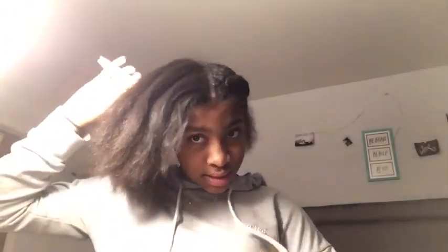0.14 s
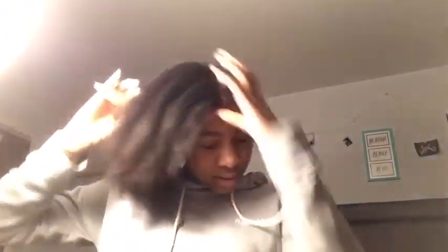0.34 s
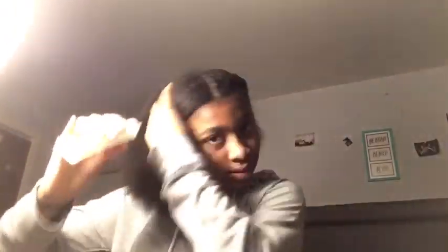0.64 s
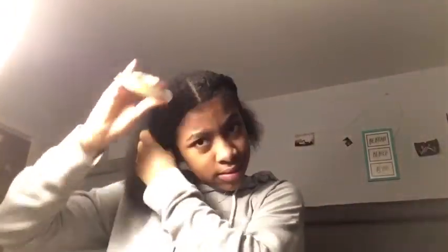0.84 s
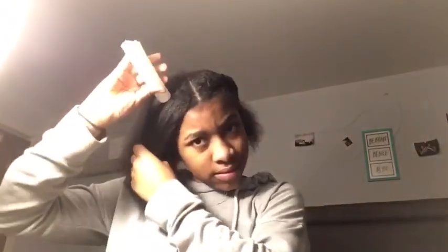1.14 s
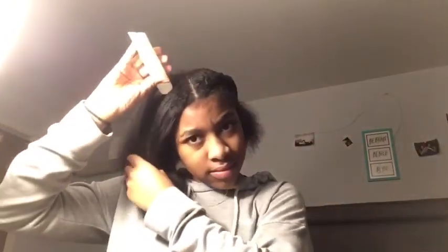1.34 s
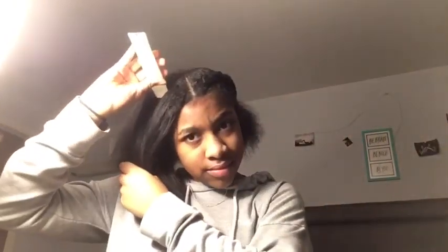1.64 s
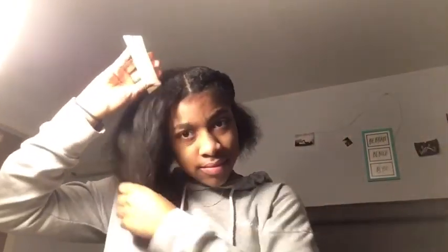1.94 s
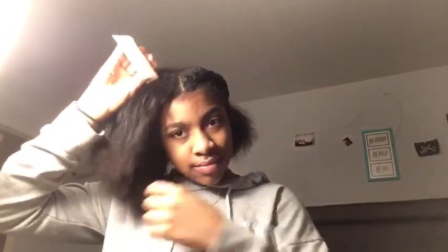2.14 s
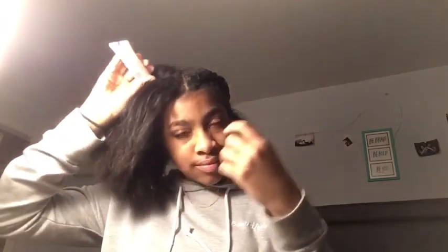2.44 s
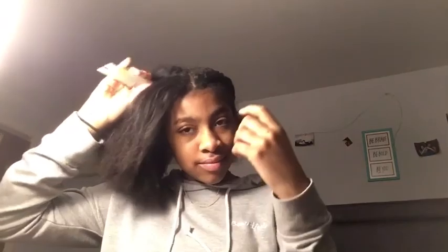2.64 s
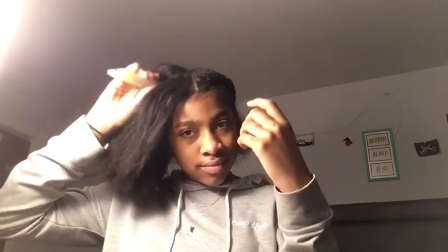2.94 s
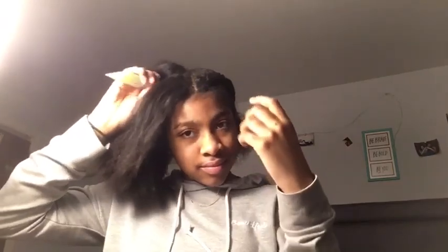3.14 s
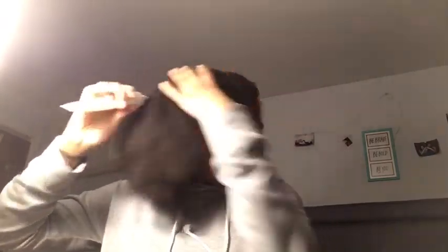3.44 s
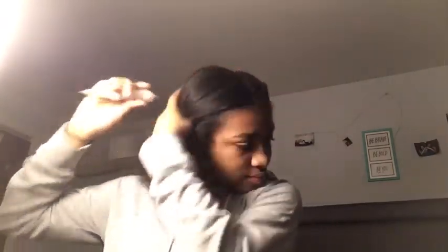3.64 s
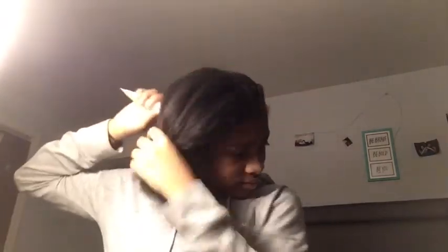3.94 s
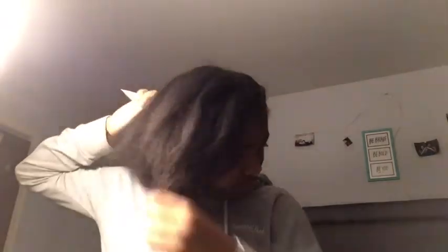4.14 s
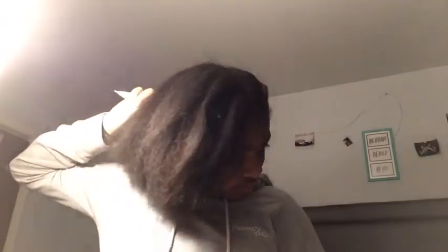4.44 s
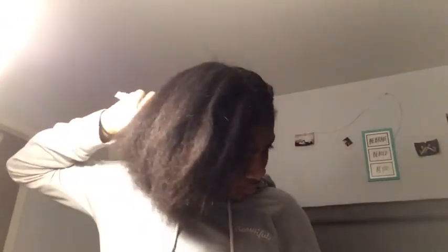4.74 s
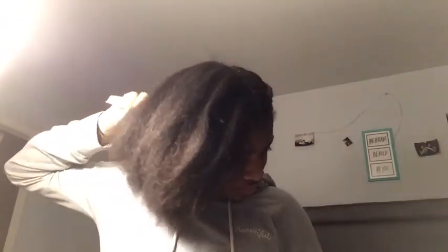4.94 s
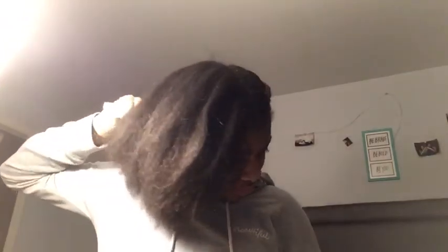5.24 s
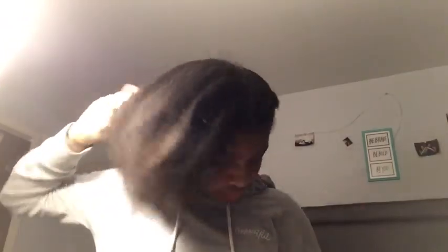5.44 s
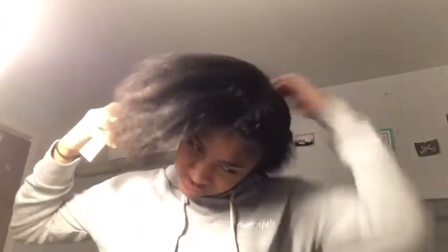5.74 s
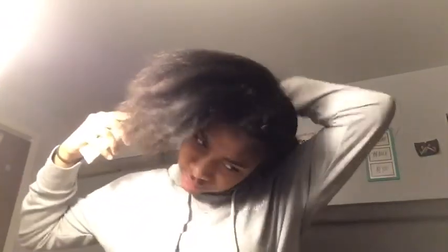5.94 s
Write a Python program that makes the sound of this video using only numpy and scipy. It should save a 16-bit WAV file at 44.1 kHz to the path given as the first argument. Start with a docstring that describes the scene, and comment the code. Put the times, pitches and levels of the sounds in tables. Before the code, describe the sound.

A plastic comb scratches through dry hair in short strokes, with sleeves rustling, over a low hum in a small room.

```python
"""A plastic comb scratches through dry hair in a small room, close to one microphone.
From the start, an appliance hums behind the wall over a swelling rumble and a steady hiss.
First the hair sweeps over cloth, with soft knocks. Short strokes follow: strands slip over the
ringing teeth, hands and sleeves rustle, tangles let go with a click. Near 4 seconds a long stroke
squeaks during a second sweep. More strokes and knocks lead to a last sweep near 6 seconds."""
import sys
import numpy as np
from scipy import signal
from scipy.fft import rfft, irfft, next_fast_len
from scipy.io import wavfile
from scipy.ndimage import uniform_filter1d, map_coordinates

SR = 44100
rng = np.random.default_rng(int(sys.argv[2]) if len(sys.argv) > 2 else 0)


def dump_mix(stems):
    """Bounce the given channels to the path in sys.argv[1] as a 16-bit WAV at rate SR."""
    frames = np.atleast_2d(stems).T  # one column per channel
    limited = np.clip(frames, -1, 1)  # hard clip at full scale
    pcm = np.round(limited * 32767).astype(np.int16)
    wavfile.write(sys.argv[1], SR, pcm)


N = 269098

# Combing has three layers: strands, teeth and hand. Each mixes a fixed "body" noise with a "ring",
# a band of noise whose pitch moves. Ring strength is the ring's level compared with the body.
# Comb strokes. Each row: peak time and length in seconds, share spent rising, strand level in dB,
# ring pitch in Hz, ring strength in dB, delay of the teeth in seconds, then the teeth's level in dB,
# ring pitch in Hz and ring strength in dB.
COMB_STROKES = [(0.033, 0.25, 0.54, -46, 7700, -3, 0, -52, 2550, -2),
                (0.144, 0.053, 0.65, -42.5, 11000, -5, 0.0092, -49, 2740, 8),
                (0.48, .25, 0.38, -57, 8950, -3, 0.0051, -61.5, 2770, -12),
                (0.982, 0.065, 0.47, -48, 9300, -6, -0.012, -53.5, 2800, -4),
                (1.118, 0.15, 0.64, -59, 7400, -5, -0.015, -55.5, 2920, -5),
                (1.243, 0.16, 0.38, -57, 8400, -3, 0.034, -60.5, 2750, -8),
                (1.456, 0.15, 0.5, -58.5, 7700, -3, -0.0068, -58.5, 2640, 6),
                (1.586, 0.15, 0.2, -54, 8500, 2, -0.011, -57, 2230, 12),
                (1.815, 0.1, .3, -56.5, 8750, 4, 0.0067, -60, 2400, 5),
                (1.95, 0.13, 0.2, -57, 8400, 0, 0.025, -55.5, 2260, 13),
                (2.01, .12, 0.5, -57.5, 8800, 1, 0.055, -64, 2440, -3),
                (2.134, 0.24, 0.4, -57.5, 8500, 0, 0, -56, 2560, -1),
                (2.245, 0.073, .15, -50.5, 8500, 2, 0, -60, 2700, -1),
                (2.3, 0.077, 0.42, -55.5, 8880, 5, -.01, -54, 2400, 7),
                (2.413, 0.099, 0.2, -56, 8100, 3, 0.0015, -56.5, 2740, -14),
                (2.518, 0.2, 0.45, -56, 8540, 4, .01, -57.5, 2670, -14),
                (2.683, 0.075, .55, -46, 10300, 2, 0, -58, 2900, -6),
                (2.746, 0.07, 0.62, -48, 7260, 4, 0.006, -52, 2620, -1),
                (2.904, 0.067, 0.51, -48.5, 8550, 3, 0.031, -52, 2760, 5),
                (3.062, 0.08, 0.38, -50, 6940, -1, -0.0035, -48.5, 2980, 2),
                (3.206, 0.062, 0.5, -47, 8750, 3, -0.018, -50, 3080, -3),
                (3.287, 0.24, 0.55, -56, 7000, 1, 0.041, -56, 2780, -11),
                (3.428, 0.085, 0.53, -61, 7800, 0, 0.0018, -54, 3350, -15),
                (3.696, 0.048, 0.5, -52, 11400, 5, 0, -71, 2750, -7),
                (4.026, 0.14, 0.57, -53, 7360, -21, 0.0083, -50, 2660, -15),
                (4.154, 0.28, .35, -43.5, 7350, -4, -0.0051, -43, 3850, 4),
                (4.43, 0.22, 0.46, -52.5, 6800, 11, -0.0094, -51, 2690, -11),
                (4.75, .13, 0.4, -54.5, 6800, -3, 0.016, -54, 2100, -1),
                (4.901, 0.083, 0.4, -56, 6460, 1, -0.0087, -56, 2350, -1),
                (5.047, 0.088, 0.44, -57, 6700, 3, 0.015, -58, 2600, -9),
                (5.188, 0.12, 0.55, -56, 6500, 4, -0.014, -59, 2140, 2),
                (5.42, 0.086, 0.6, -61, 6700, -2, 0.0034, -61, 2400, -3),
                (5.313, 0.051, .6, -56, 8390, -7, 0.0091, -55, 2800, -2),
                (5.637, 0.11, 0.47, -54.5, 8600, 3, 0.034, -61.5, 2580, 4),
                (5.95, .18, 0.65, -54.5, 7900, -4, 0.0043, -54.5, 2650, 0)]
# Hand and sleeve brush past. Each row: peak time and length in seconds, share spent rising,
# level in dB, ring pitch in Hz, ring strength in dB.
HAND_RUBS = [(0.03, .15, .5, -48, 554, -15), (0.106, 0.12, 0.48, -38.5, 910, -4.5),
             (0.23, 0.076, 0.4, -59, 480, 9), (0.43, 0.18, 0.23, -52.5, 590, 1),
             (0.563, 0.13, 0.34, -50.5, 740, 6), (0.913, 0.13, .6, -63, 760, -23),
             (1.805, .2, 0.1, -63, 560, 2), (2.247, 0.22, 0.2, -59, 800, 0),
             (2.69, 0.11, 0.33, -53, 980, 8), (3.082, 0.094, 1, -56, 690, -16),
             (3.35, 0.064, 0.43, -52, 704, -5), (3.497, 0.12, 0.6, -53, 600, 4),
             (3.723, 0.092, 0.51, -50.5, 890, -0.5), (3.863, .14, 0.2, -61, 900, -9),
             (4.022, 0.092, 0.4, -51, 900, 7), (4.197, 0.089, .3, -56, 790, 12),
             (4.415, .12, 0.2, -50, 780, 4), (4.753, 0.052, 0.44, -53.5, 1090, -7),
             (4.903, 0.046, 0.5, -52, 1110, -6), (5.036, 0.066, 0.5, -54, 800, -14),
             (5.27, .12, 0.47, -56, 640, 9), (5.565, 0.065, 0.43, -53, 1180, -8),
             (5.81, 0.065, .4, -52, 600, -5), (5.855, 0.12, 0.6, -51.5, 1320, 2)]
# Comb and hand rest in the hair. Each row: time in seconds, then strand, teeth and hand levels in dB.
REST_LEVELS = [(0, -69, -66, -60.5), (.8, -65, -64.5, -59.5), (1.6, -76, -70.5, -61),
               (2.1, -64.5, -66, -57.5), (2.8, -63, -62, -59.5), (3.2, -61, -67.5, -60),
               (3.6, -62.5, -64, -59), (3.9, -65.5, -65, -57), (4.7, -70, -66, -58),
               (5.1, -69.5, -70, -60.5), (5.5, -63, -59.5, -58.5), (5.75, -63.5, -60, -58),
               (6.1, -63, -67.5, -59)]
# Strands, teeth and hand at rest. Each row: ring pitch in Hz, ring strength in dB.
REST_RINGS = [(7850, -7), (2560, -8), (640, -5.5)]
# The same layers in a sweep. Each row: dB added to the sweep level, ring pitch in Hz, strength in dB.
SWEEP_LAYERS = [(-5, 7200, -10), (-4, 2700, -27), (-3.5, 680, 0.5)]
# The bands that each layer's ring moves between. Each row: pitch in Hz, width in Hz.
STRAND_BANDS = [(6600, 900), (7600, 1100), (9500, 1400), (11500, 2200)]
TEETH_BANDS = [(2100, 400), (2700, 450), (3300, 550), (3900, 600)]
HAND_BANDS = [(400, 150), (650, 250), (950, 350), (1350, 450)]
# Pitches at which the comb and the room ring. Each row: pitch in Hz, width in Hz, relative level in dB.
TEETH_MODES = [(2200, 800, 0), (3700, 1100, 0), (6800, 1000, -9)]
ROOM_MODES = [(283.7, 3.9, 9), (363.5, 12.4, 14.5), (415, 38, 3), (654, 74, 4), (878, 10, -31),
              (866, 9.3, -30), (1230, 190, -11), (1445, 20, -16)]
# The tone colour of each noise. Each row: frequency in Hz, relative level in dB.
STRAND_COLOUR = [(1500, -36), (4000, 8), (5500, 12.5), (7000, 12.5), (8300, 9), (9700, 11.5), (12000, 12),
                 (15500, 0.5)]
SLEEVE_COLOUR = [(120, -23), (250, 0), (400, -2), (900, -4), (1400, -3.5), (2000, -8.5), (5000, -33)]
SWEEP_COLOUR = [(240, -26), (400, -7), (785, -9.5), (957, -4), (1130, 4), (3680, -7), (5000, -4.5),
                (7010, -11), (11400, -29), (15500, -21)]
HISS_COLOUR = [(70, -35), (100, 5.5), (130, -3.5), (280, -5.5), (500, -21), (900, -14.5), (1650, -29),
               (2500, -29), (4800, -23.5), (6800, -24), (9500, -27), (12000, -29), (14000, -30),
               (15500, -31)]
DRONE_COLOUR = [(15, -33), (25, -16), (35, 7), (47, 2.5), (62, 7), (85, -0.5), (110, -13), (160, -16),
                (400, -51)]
# Hair sweeps over cloth, one list per sweep. Each row: time in seconds, level in dB.
HAIR_SWEEPS = [
    [(0, -53), (.08, -50.5), (.14, -43), (.17, -53.5), (.25, -70)],
    [(3.94, -81), (3.95, -54.5), (4.03, -51), (4.12, -46), (4.2, -47.5), (4.3, -46.5), (4.45, -52.5),
     (4.58, -54.5), (4.66, -66)],
    [(5.78, -65), (5.86, -56.5), (5.94, -52.5), (6.02, -61)],
]
# The squeak's glide. Each row: time in seconds, pitch in Hz, level in dB.
SQUEAK_GLIDE = [(4.1, 1800, -72), (4.12, 2080, -53), (4.145, 2220, -50), (4.19, 2300, -52),
                (4.22, 2250, -70)]
# Soft knocks. Each row: start in seconds, relative level in dB, pitch in Hz, seconds to fade by 60 dB.
SOFT_KNOCKS = [(0.146, -39, 700, 0.0047), (0.157, -38.5, 399, 0.074), (3.346, -47, 630, 0.055),
               (4.402, -32.5, 253, 0.019), (5.564, -30.5, 1370, 0.0066), (5.731, -43, 300, 0.047),
               (5.81, -42.5, 590, 0.036)]
# Tangles let go. Each row: start in seconds, level in dB before filtering.
TANGLE_SNAPS = [(1.5694, -50), (1.6, -49), (1.6135, -43), (1.6361, -38.5), (1.6886, -46), (1.7962, -52),
                (2.085, -40), (2.2457, -47), (2.4123, -44), (3.048, -46), (3.3194, -45), (3.9453, -40),
                (4.7101, -47), (5.3042, -49)]
# The motor's steady tones. Each row: pitch in Hz, level in dB.
MOTOR_TONES = [(29.6, -68), (72.0, -43.5), (91.0, -60), (120.0, -69), (144.0, -66)]
# The rumble swells. Each row: peak time in seconds, length in seconds, level in dB.
RUMBLE_SWELLS = [(0.0, 0.13, -45), (0.166, 0.11, -46), (0.5, 0.12, -36), (0.607, 0.11, -41.5),
                 (1.07, .14, -40), (1.253, 0.42, -48), (1.71, 0.14, -38), (1.944, 0.3, -42.5),
                 (2.083, .08, -42), (2.237, 0.13, -39), (2.47, 0.24, -45.5), (2.936, 0.055, -36),
                 (3.066, .09, -39.5), (3.468, 0.15, -40.5), (3.66, 0.054, -39), (3.764, 0.14, -44),
                 (4.08, 0.075, -36.5), (4.347, 0.21, -43), (4.518, 0.053, -40), (4.627, 0.17, -39.5),
                 (4.787, 0.18, -43), (4.936, 0.13, -41.5), (5.302, 0.1, -41), (5.423, 0.26, -45.5),
                 (5.65, .25, -48), (5.845, 0.12, -34), (5.966, .12, -42), (6.1, 0.15, -39)]
# The room's echo. Each row: frequency in Hz, seconds to fade by 60 dB.
ROOM_DECAY = [(200, 0.67), (2000, 0.079), (10000, 0.37)]
# Dips caused by the microphone housing. Each row: frequency in Hz, width in Hz, depth from 0 to 1.
HOUSING_DIPS = [(4900, 390, 0.21), (7780, 1100, 0.2), (10400, 290, 0.4)]

RUMBLE_HZ, RUMBLE_LEAST_DB = 54, -60
HISS_DB, DRONE_DB, ECHO_DB = -57, -52, -10.5
TOP_HZ = 15720
TIME = np.arange(N) / SR  # seconds


def combing():
    """Strands fizz as they slip over the comb, its teeth ring, and hand and sleeve rustle low."""
    peak_s, length_s, rise, strand_db, strand_hz, strand_ring_db, *teeth_columns = zip(*COMB_STROKES)
    delay_s, teeth_db, teeth_hz, teeth_ring_db = teeth_columns
    rub_s, rub_length_s, rub_rise, hand_db, hand_hz, hand_ring_db = zip(*HAND_RUBS)
    strands = bumps(peak_s, length_s, strand_db, rise), strand_hz, strand_ring_db
    teeth = bumps(np.add(peak_s, delay_s), length_s, teeth_db, rise), teeth_hz, teeth_ring_db
    hand = bumps(rub_s, rub_length_s, hand_db, rub_rise), hand_hz, hand_ring_db
    grips = map(grip, (strands, teeth, hand), curves(REST_LEVELS), REST_RINGS, SWEEP_LAYERS)
    sleeve = lambda hz: colour(SLEEVE_COLOUR)(hz) * (1 + amp(-6) * resonances(ROOM_MODES)(hz))
    bodies = colour(STRAND_COLOUR), resonances(TEETH_MODES), sleeve
    return sum(map(rubbing, grips, bodies, (STRAND_BANDS, TEETH_BANDS, HAND_BANDS)))


def grip(events, rest_db, rest_ring, sweep_layer):
    """A layer's gain, ring pitch and ring strength: the louder a movement, the more it sets the ring."""
    event_power, event_hz, event_ring_db = events
    rest_hz, rest_ring_db = rest_ring
    sweep_db, sweep_hz, sweep_ring_db = sweep_layer
    rest_power = amp(rest_db) ** 2
    sweep_power = (sweep_gain() * amp(sweep_db)) ** 2
    total = per_sample(event_power.sum(axis=0)) + rest_power + sweep_power

    def blend(in_events, at_rest, in_sweep):
        return (per_sample(in_events @ event_power) + at_rest * rest_power + in_sweep * sweep_power) / total

    ring_hz = blend(event_hz, rest_hz, sweep_hz)
    ring_db = blend(event_ring_db, rest_ring_db, sweep_ring_db)
    return np.sqrt(total), ring_hz, ring_db


def rubbing(layer_grip, body_response, bands):
    """Friction with a fixed body colour and a ring that follows the grip."""
    gain, ring_hz, ring_db = layer_grip
    body = unit(filtered(friction(lumpy_db=2, patchy_db=1.3), body_response))
    ring = amp(ring_db) * ringing(bands, ring_hz)
    return gain * (body + ring) / np.sqrt(1 + amp(ring_db) ** 2)


def ringing(bands, ring_hz):
    """A ring that moves in pitch, made by fading between fixed bands of friction noise."""
    centres = [hz for hz, _ in bands]
    out = np.zeros(N)
    for (hz, width), this_band in zip(bands, np.eye(len(bands))):
        share = np.interp(ring_hz, centres, this_band)
        band = resonances([(hz, 1.5 * width, 0)])
        slips = friction(lumpy_db=2, patchy_db=2)
        out += np.sqrt(share) * unit(filtered(slips, lambda f: band(f) ** 2))  # squared for steep sides
    return out


def friction(lumpy_db, patchy_db):
    """Many tiny slips: noise in lumps of a few milliseconds and in patches of frequency."""
    slips = rng.standard_normal(N) * amp(lumpy_db * np.tanh(wobble(250)))
    spectra = signal.stft(slips, nperseg=256)[2]
    patches = uniform_filter1d(rng.standard_normal(spectra.shape), 8, axis=0)
    patches = unit(uniform_filter1d(patches, 12, axis=1))
    return signal.istft(spectra * amp(patchy_db * patches), nperseg=256)[1][:N]


def sweeps():
    """The whole mass of hair slides over cloth with a broad swish."""
    return sweep_gain() * unit(filtered(friction(lumpy_db=-4, patchy_db=4), colour(SWEEP_COLOUR)))


def sweep_gain():
    """How strong the sweeps are at each moment; zero between them."""
    return sum(amp(curves(rows)[0]) * (TIME >= rows[0][0]) * (TIME < rows[-1][0]) for rows in HAIR_SWEEPS)


def squeak():
    """A thin, rough tone rises inside the long stroke."""
    pitch_hz, db = curves(SQUEAK_GLIDE)
    sounding = (TIME > SQUEAK_GLIDE[0][0]) & (TIME < SQUEAK_GLIDE[-1][0])
    rough_tone = tone(pitch_hz * (1 + 0.015 * wobble(150)))
    return sounding * amp(db + 3 * np.tanh(wobble(120))) * rough_tone


def knocks():
    """Each contact rings at one pitch and dies away quickly."""
    out, t = np.zeros(N + SR), np.arange(SR // 4) / SR
    attack = 1 - np.exp(-t / 0.00013)
    for start_s, db, hz, fade_s in SOFT_KNOCKS:
        fade = amp(db + 4.5 - 60 * t / fade_s)
        out[round(start_s * SR):][:len(t)] += attack * fade * np.sin(2 * np.pi * hz * t)
    return out[:N]


def snaps():
    """Each tangle lets go with a soft click, a noise burst that fades by 60 dB in 12 milliseconds."""
    out, t = np.zeros(N + SR), np.arange(SR // 50) / SR
    for start_s, db in TANGLE_SNAPS:
        out[round(start_s * SR):][:len(t)] += amp(db - 60 * t / 0.012) * rng.standard_normal(len(t))
    return filtered(out[:N], resonances([(4500, 13000, 0)]))


def room_echo(sound):
    """The room answers with an echo in which each frequency dies at its own speed."""
    hz, t, spectra = signal.stft(rng.standard_normal(SR // 2), SR, nperseg=256)
    fade = amp(-60 * t / along(ROOM_DECAY, hz)[:, None])
    tail = signal.istft(spectra * fade, SR, nperseg=256)[1]
    delayed = np.pad(sound, (250, 0))
    return signal.fftconvolve(delayed, tail / np.linalg.norm(tail))[:N]


def appliance():
    """A motor hums at steady pitches, over a low tone that wanders and swells."""
    hum = sum(amp(db + 0.7 * wobble(3)) * np.sqrt(2) * np.sin(2 * np.pi * (hz * TIME + rng.random()))
              for hz, db in MOTOR_TONES)
    rumble = tone(RUMBLE_HZ * (1 + 0.047 * wobble(5.2)))
    swells = bumps(*zip(*RUMBLE_SWELLS), rise=0.39).sum(axis=0)
    rounded = per_sample(uniform_filter1d(swells, size=21))  # smoothed over 21 milliseconds
    return hum + np.sqrt(rounded + amp(RUMBLE_LEAST_DB) ** 2) * rumble


def background():
    """The room and the microphone's amplifier hiss over a deep drone."""
    hiss = filtered(friction(lumpy_db=-2.5, patchy_db=0), colour(HISS_COLOUR))
    drone = filtered(rng.standard_normal(N), colour(DRONE_COLOUR))
    return amp(HISS_DB) * unit(hiss) + amp(DRONE_DB) * unit(drone)


def bumps(peak_s, length_s, db, rise):
    """Each event's power, one value per millisecond, 10 dB below its peak at both ends."""
    peak_s, length_s, db, rise = (np.reshape(column, (-1, 1)) for column in (peak_s, length_s, db, rise))
    late = (np.arange(N * 1000 // SR + 2) / 1000 - peak_s) / length_s
    rise = np.clip(rise, 0.1, 0.9)
    drop_db = 10 * np.where(late < 0, -late / rise, late / (1 - rise))
    return amp(db - drop_db) ** 2


def per_sample(per_ms):
    """Stretches one value per millisecond to one per sample."""
    return np.interp(TIME * 1000, np.arange(len(per_ms)), per_ms)


def curves(rows):
    """Turns each column after the time into one value per sample."""
    times, *columns = np.transpose(rows)
    return [np.interp(TIME, times, column) for column in columns]


def wobble(rate):
    """A smooth random curve through `rate` points a second."""
    return map_coordinates(rng.standard_normal(int(N * rate / SR) + 4), [TIME * rate])


def tone(pitch_hz):
    """A sine wave of average power 1 that follows a changing pitch."""
    return np.sqrt(2) * np.sin(2 * np.pi * np.cumsum(pitch_hz) / SR)


def filtered(sound, response):
    """Scales each frequency of a sound by a filter's response."""
    size = next_fast_len(N + SR // 2)
    return irfft(rfft(sound, size) * response(np.fft.rfftfreq(size, 1 / SR)), size)[..., :N]


def resonances(modes):
    """A filter that rings at each of the given pitches."""
    return lambda f: sum((-1) ** k * amp(db) * 1j * f * width / (hz * hz - f * f + 1j * f * width)
                         for k, (hz, width, db) in enumerate(modes))


def colour(points):
    """A filter that follows a tone colour table."""
    return lambda hz: amp(along(points, hz))


def along(points, hz):
    """Reads between a table's rows on a logarithmic frequency scale."""
    frequencies, values = np.transpose(points)
    return np.interp(np.log(hz + 1), np.log(frequencies + 1), values)


def amp(db):
    """Turns dB into a gain."""
    return 10 ** (np.asarray(db) / 20)


def unit(x):
    """Scales a signal to an average power of 1."""
    return x / np.sqrt(np.mean(x ** 2) + 1e-20)


def scene():
    """Close sounds, their echo and the background; one microphone feeds both channels."""
    near = combing() + sweeps() + squeak() + knocks() + snaps()
    mono = near + amp(ECHO_DB) * room_echo(near) + appliance() + background()
    return np.array([mono, mono])


def record(dry):
    """The microphone housing weakens a few pitches, and the highest treble is cut off."""
    def response(f):
        dips = [1 - np.clip(depth, 0, 0.9) / (1 + (2 * (f - hz) / width) ** 2)
                for hz, width, depth in HOUSING_DIPS]
        return np.prod(dips, axis=0) * (f < TOP_HZ)

    return filtered(dry, response)


dry = scene()
out = record(dry)
dump_mix(out)
```